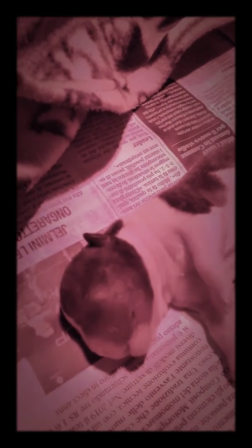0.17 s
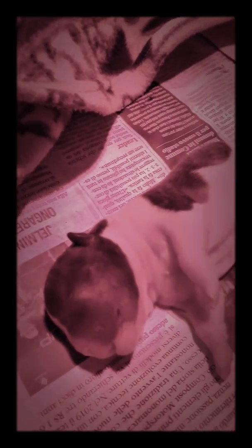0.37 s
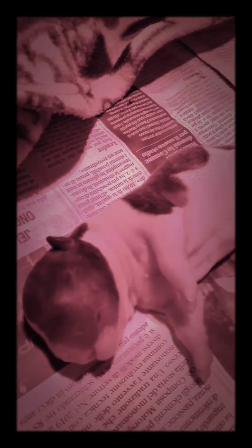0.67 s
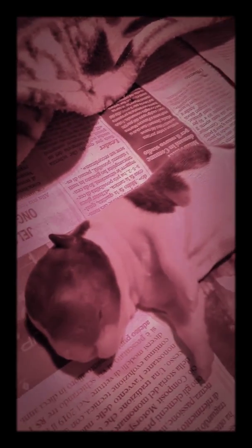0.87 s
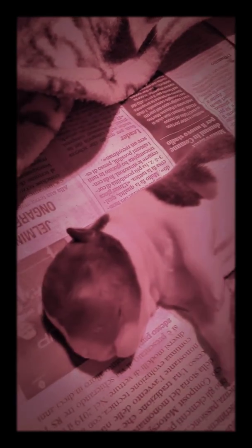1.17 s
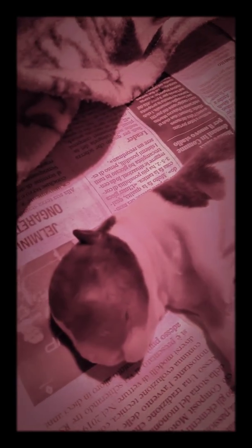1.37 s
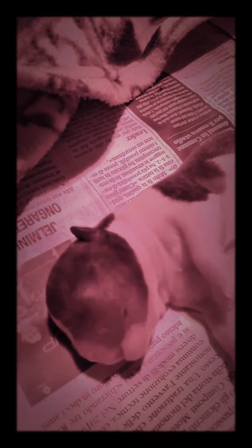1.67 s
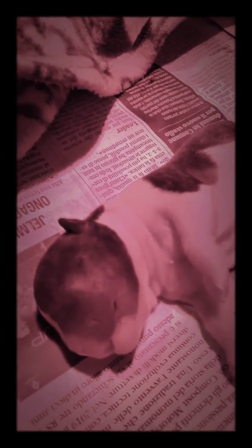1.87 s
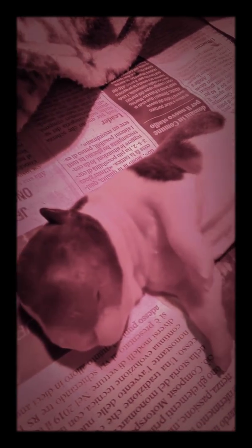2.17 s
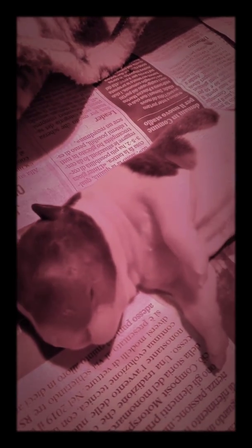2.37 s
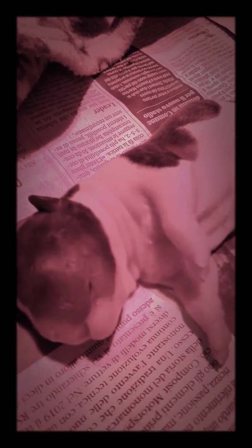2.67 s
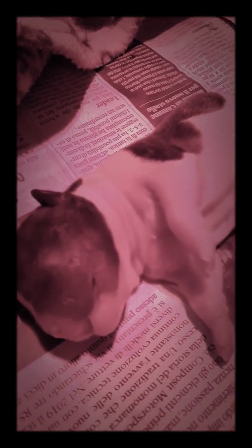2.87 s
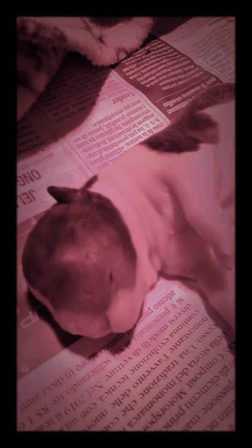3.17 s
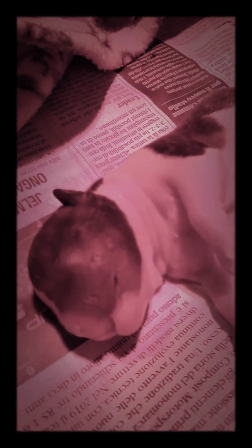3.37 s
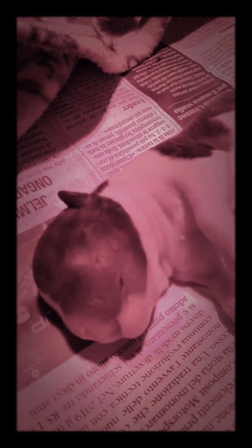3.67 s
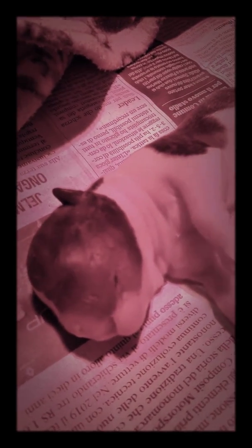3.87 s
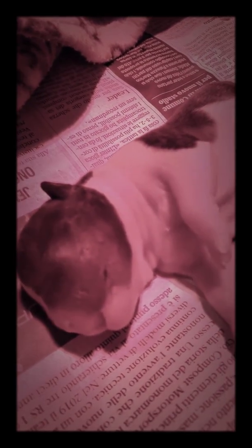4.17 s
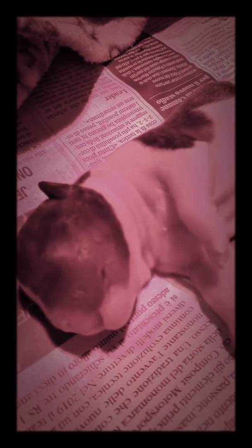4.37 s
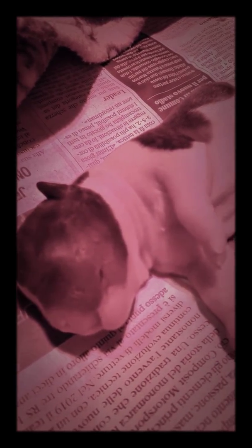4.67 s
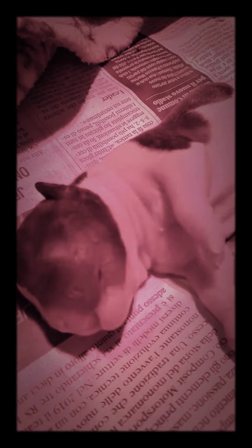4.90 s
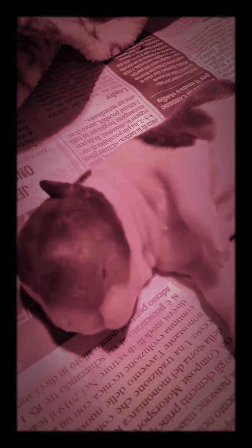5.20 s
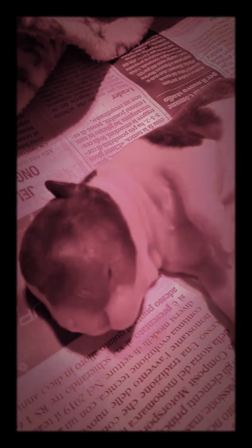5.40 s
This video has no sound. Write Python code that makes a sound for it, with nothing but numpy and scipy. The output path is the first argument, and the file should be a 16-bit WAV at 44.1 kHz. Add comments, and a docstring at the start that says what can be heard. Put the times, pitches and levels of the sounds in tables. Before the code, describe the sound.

Close, dry stereo sound of a small soft body twitching on newspaper in a very quiet room. From 0.1 to 0.5 s a gentle rub with fine hiss and a padded low bump at 0.3. Raspier rubbing follows around 0.6-1.0, with a dull thump near 0.86. Brief bright brushes and small ticks come at 1.3 and 1.6. At 2.2 a rub leads to a sharp, crisp crease snap and scuff at 2.33. More rubbing near 2.6, then a strong raspy scuff at 2.9 and a deep soft bump at 3.0. A quick flurry of scuffs, clicks and left-sided thuds runs 3.2-3.6, with a light brush at 3.86. From 4 to 5 s it is almost still, with faint stirrings and a muffled bump at 4.56. A last burst at 5.0-5.3 brings a bright scuff, snap and thud, then rubbing to the end. Low judder on the left; faint hiss and right-sided drone throughout.

```python
"""Something soft rubs and scuffs on paper close to the microphones, in a quiet room.
The rubs and scuffs are filtered friction noise; creases tick as dispersed, resonant clicks.
Soft bumps now and then are pushes that rock damped low resonances.
A low rumble and judder lie under the rubbing movements, strongest on the left.
Faint noise makes the room and a low drone on the right."""
import sys
import numpy as np
from scipy import signal
from scipy.fft import rfft, irfft
from scipy.io import wavfile
from scipy.ndimage import uniform_filter1d

SR = 44100
rng = np.random.default_rng(int(sys.argv[2]) if len(sys.argv) > 2 else 0)


def transcribe(u):
    """Save the signal u as a 16-bit wav file named by the first command-line argument.

    u: samples, shape (n,) or (channels, n), limited to [-1, 1]; the rate is SR.
    q: integer samples, one column per channel.
    """
    v = np.clip(np.atleast_2d(u).T, -1, 1)
    q = np.round(v * 32767).astype(np.int16)
    wavfile.write(sys.argv[1], SR, q)


N = 244314
TIME = np.arange(N) / SR


def amp(db):
    """Logarithmic level: decibels become an amplitude gain."""
    return 10 ** (np.asarray(db) / 20)


def unit(x):
    """Normalisation: scales a signal to rms 1."""
    return x / np.sqrt(np.mean(x ** 2) + 1e-20)


def colour(x, spectrum):
    """Minimum-phase filtering: a causal response with the given spectrum and a power gain of 1."""
    hz, db = np.transpose(spectrum)
    f = abs(np.fft.fftfreq(4096, 1 / SR))
    level_db = np.interp(np.log(f + 1), np.log(hz + 1), db)
    log_gain = np.log(amp(np.maximum(level_db, -100)))
    # the Hilbert transform of the log gain supplies the phase
    taps = np.fft.ifft(np.exp(np.conj(signal.hilbert(log_gain)))).real[:2048]
    taps = taps / np.linalg.norm(taps)
    return signal.oaconvolve(x, taps[None], axes=1)[:, :N]


def pan(db):
    """Level stereophony: gains for a left-over-right difference, at constant power."""
    ratio = amp(np.atleast_1d(db))
    return np.array([ratio, np.ones_like(ratio)]) * np.sqrt(2 / (1 + ratio ** 2))


def noise(alike):
    """Partial coherence: white noise at two microphones with the given correlation."""
    a, b = rng.standard_normal((2, N))
    alike = np.clip(alike, -1, 1)
    return np.array([a, alike * a + np.sqrt(1 - alike ** 2) * b])


def wander(hz):
    """Low-pass random fluctuation: slow chance of rms 1, up to the given rate."""
    f = np.fft.rfftfreq(N, 1 / SR)
    return unit(irfft(rfft(rng.standard_normal(N)) / (1 + (f / hz) ** 4), N))


def fibres(per_s, spread_db, smooth, alike):
    """Asperity friction: countless tiny slips, with some larger catches among them."""
    size = amp(spread_db * np.minimum(rng.exponential(1, N), 4))
    catches = size * (rng.random(N) < per_s / SR)
    return unit(noise(alike) * (unit(catches) + smooth))


def add(mix, s, sound):
    """Superposition: mixes a stereo sound in at time s."""
    part = mix[:, max(round(s * SR), 0):][:, :sound.shape[1]]
    part += sound[:, :part.shape[1]]


def stroke(start, length, rise_s, fall_s, ease, swell_db=0):
    """Envelope of one movement: it eases in, holds while swelling or fading, and eases out."""
    early = np.maximum(start - TIME, 0)
    late = np.maximum(TIME - start - length, 0)
    # each flank's time constant grows by ease seconds per second of length
    away = early / (rise_s + ease * length) + late / (fall_s + ease * length)
    swell = amp(swell_db * (np.clip((TIME - start) / length, 0, 1) - .5))
    return swell * np.exp(-np.minimum(away, 20))


# the sheet's main resonance, moving with the place of contact: time_s [s], resonance_hz [Hz]
SHEET_RESONANCE = [(.35, 1670), (.8, 950), (1.2, 1800), (5.1, 1660), (5.3, 1360)]


def flex(x, patchy_db, hz_size, time_size, resonance_db=0):
    """Time-varying resonance: colour drifts in random patches; the sheet's resonance and octave stand out."""
    hz, t, z = signal.stft(x, SR, nperseg=1024, noverlap=768)
    patches = rng.standard_normal(z.shape[1:])
    for _ in range(2):
        patches = uniform_filter1d(patches, hz_size, 0)
        patches = uniform_filter1d(patches, time_size, 1)
    octaves = np.log2((hz[:, None] + 1) / np.interp(t, *np.transpose(SHEET_RESONANCE)))
    peaks = np.exp(-(octaves / 0.36) ** 2) + 0.45 * np.exp(-((octaves - 1) / 0.36) ** 2)
    gain = amp(patchy_db * unit(patches) + resonance_db * peaks)
    return unit(signal.istft(z * gain, SR, nperseg=1024, noverlap=768)[1][:, :N])


# what the sheets ring with when snapped or scuffed: mode_hz [Hz], level_db [dB], t60_s [s]
SHEET_MODES = [(345, 8, 0.04), (1240, 5, 0.032), (2100, 0, 0.018), (2900, -1, 0.016)]


def ring(x):
    """Modal resonance: a sound together with the modes that it sets ringing."""
    out = x
    for hz, db, t60 in SHEET_MODES:
        out = out + amp(db) * signal.lfilter(*signal.iirpeak(hz, hz * t60 / 2.2, fs=SR), x)
    return out


# shading of the right microphone from the finest hiss: frequency_hz [Hz], gain_db [dB]
RIGHT_SHADE = [(2000, -5), (4500, -1), (7500, 3.5), (12000, -15.5)]


def shaded(x):
    """Acoustic shading: a frequency-dependent gain colours the right channel only."""
    hz, db = np.transpose(RIGHT_SHADE)
    gain = amp(np.interp(np.fft.rfftfreq(N, 1 / SR), hz, db))
    return np.array([x[0], irfft(rfft(x[1]) * gain, N)])


# spectral shape of still air and microphone hiss: frequency_hz [Hz], density_db [relative dB per Hz]
ROOM_SPECTRUM = [(150, -10), (450, 2), (2600, -3.5), (9000, -8), (15600, -6)]
# spectral shape of the low drone: frequency_hz [Hz], density_db [relative dB per Hz]
DRONE_SPECTRUM = [(25, -19), (75, 4.5), (200, -3.5), (300, 2), (430, -4.5), (1500, -25)]


def room():
    """Stationary noise floor: still air and microphone hiss, with a faint low drone on the right."""
    air = amp(-71.0) * colour(noise(0), ROOM_SPECTRUM)
    drone = amp(-69.0) * colour(noise(0), DRONE_SPECTRUM)
    return air + drone * np.array([[0], [1]])


# spectral shape of dull rumble and shivers: frequency_hz [Hz], density_db [relative dB per Hz]
RUMBLE_SPECTRUM = [(25, -36.5), (50, -10), (80, 0), (150, 4.5), (330, -11), (1000, -24.5), (2000, -53)]
# low rumbles under the rubbing: start_s [s], length_s [s, without flanks], level_db [relative dB]
RUMBLES = [(0.067, 0.35, -52), (0.571, 0.12, -57), (0.768, 0.25, -56.5), (1.096, 0.093, -56.5),
           (1.292, 0.46, -53.5), (1.767, 0.28, -56), (2.109, 0.28, -50.5), (2.478, 0.24, -55.5),
           (3.202, 0.26, -62.5), (3.55, 0.061, -52.5), (3.822, 0.11, -58), (4.225, 0.061, -63),
           (4.379, 0.01, -65.5), (4.549, 0.052, -57.5), (5.03, 0.12, -54), (5.257, 0.15, -56.5),
           (5.462, 0.094, -50.5)]


def rumble(rise_s=0.0033, fall_s=0.012, ease=0.053):
    """Stick-slip friction: dull, uneven noise and a drifting judder under the rubbing movements."""
    power = 0
    for start, length, db in RUMBLES:
        power = power + (amp(db) * stroke(start, length, rise_s, fall_s, ease)) ** 2
    slips = flex(colour(noise(0.81), RUMBLE_SPECTRUM), patchy_db=3, hz_size=2, time_size=4)
    turns = np.cumsum(250 * np.exp(0.32 * wander(hz=43.77))) / SR  # near-regular, around 250 Hz
    judder = np.sin(2 * np.pi * turns) * (1 + .5 * wander(hz=18.0))
    return unit(slips + 0.41 * judder) * np.sqrt(power) * pan(8.2)


# soft bumps: release_s [s], push_db [relative dB], ring_hz [Hz], sharpness_q [Q],
# left_over_right_db [dB]
BUMPS = [(0.307, -18.5, 127, 0.74, 11), (0.857, -20.5, 133, 1.7, 11), (1.287, -31.5, 234, 3.3, 19),
         (1.5084, -40, 173, 3.6, 11), (1.635, -42, 620, 8.2, 14), (2.335, -25.5, 248, 1.9, 27),
         (2.351, -26, 189, 3.4, 25), (2.658, -25.5, 342, 3.3, 22), (2.903, -32, 193, 5.1, 16),
         (2.993, -19.5, 147, 1.37, 11), (3.3038, -36, 102, 2.9, 8), (3.35, -28.5, 120, 7.9, 34),
         (3.396, -31, 122, 5.2, 23), (3.426, -28, 122, 5.8, 42), (3.5662, -23, 190, 0.83, 28),
         (3.871, -36.5, 98, 2.6, 15), (4.064, -41, 140, 5.1, 31), (4.562, -27, 106, 0.76, 30),
         (5.181, -21.5, 139, 4.8, 28), (5.186, -27, 330, 7, 14)]


def bumps(build_s=0.0055, release_turns=0.051, shiver_db=-25, shiver_s=0.016):
    """Damped oscillator: a padded push builds and lets go, rocking a low resonance; the sheets shiver."""
    t = np.arange(-1500, 6000) / SR  # 0 is the moment of release
    out, shiver = np.zeros((2, 2, N))
    for s, db, hz, q, side_db in BUMPS:
        w = 2 * np.pi * hz
        # the release lasts a fixed share of the ring's period
        push = np.exp(np.minimum(t, 0) / build_s) * (1 - np.tanh(t * hz / (2 * release_turns)))
        thud = signal.lfilter(*signal.bilinear([1, 0, 0], [1, w / q, w * w], SR), push)
        add(out, s + t[0], amp(db - 6.5) * pan(side_db) * thud)
        add(shiver, s, amp(db + shiver_db) * pan(side_db) * np.exp(-(t - t[0]) / shiver_s))
    return out + colour(shiver * noise(0.23), RUMBLE_SPECTRUM)


# spectral shapes of fine hiss and of rasp: frequency_hz [Hz], density_db [relative dB per Hz]
HISS_SPECTRUM = [(2000, -9.5), (5000, -10), (6500, -6.5), (10200, 2.5), (12300, -4.5), (15600, -5.5)]
RASP_SPECTRUM = [(200, -26), (480, -2.5), (950, -2), (1400, -8), (2100, -2.5), (3500, -6), (5200, -10.5),
                 (9000, -14)]
# faint background hiss, dropping a little near 4 s: time_s [s], hiss_db [relative dB]
BACKGROUND_HISS = [(3.6, -66.5), (4.0, -73)]
# slow rubs: start_s [s], length_s [s, without flanks], hiss_db [relative dB], rasp_db [relative dB],
# swell_db [dB, start to end], left_over_right_db [dB]
SLIDES = [(0.193, 0.18, -48, -55, 1.5, -1.5), (0.55, 0.31, -72, -55, 5, 9),
          (0.779, 0.092, -53.5, -46.5, -4, 4), (0.898, 0.12, -60, -60, -4.5, 1),
          (1.081, 0.087, -51, -60.5, 0, -2), (1.266, 0.073, -54, -86, -4, 1.5),
          (1.425, 0.14, -56, -68.5, 5.5, -1.5), (1.79, 0.15, -59.5, -71, 2, 0.5),
          (2.027, 0.087, -55.5, -64.5, -4.5, 4), (2.195, 0.083, -45.5, -47.5, 2.5, 3.5),
          (2.348, 0.19, -56.5, -65.5, -15.5, 0.5), (2.579, 0.1, -50, -53, 6.5, 6),
          (2.776, 0.052, -62, -58.5, -7, 4.5), (3.297, 0.074, -58.5, -75, -8.5, -1),
          (3.556, 0.05, -53.5, -69, -3, 3), (3.843, 0.086, -60.5, -66, 4.5, 5),
          (5.042, 0.048, -53, -51.5, -3.5, 3), (5.119, 0.083, -58, -59, -3, -3),
          (5.258, 0.18, -55.5, -54.5, 1.5, -2.5), (5.47, 0.054, -52.5, -51.5, 11, 5.5)]


def sliding(rise_s=0.0056, fall_s=0.0011, ease=0.33, background_rasp_db=-12.5):
    """Sliding friction: something soft rubs on paper, a rasp under a fine hiss, both with uneven pressure."""
    hiss_power = np.ones((2, 1)) * amp(np.interp(TIME, *np.transpose(BACKGROUND_HISS))) ** 2
    rasp_power = hiss_power * amp(background_rasp_db) ** 2  # relative to the background hiss
    for start, length, hiss_db, rasp_db, swell_db, side_db in SLIDES:
        power = (pan(side_db) * stroke(start, length, rise_s, fall_s, ease, swell_db)) ** 2
        hiss_power += amp(hiss_db) ** 2 * power
        rasp_power += amp(rasp_db) ** 2 * power
    pressure = wander(hz=25.2)
    hiss = colour(fibres(per_s=2000, spread_db=1.6, smooth=1.8, alike=0), HISS_SPECTRUM)
    rasp = colour(fibres(per_s=2600, spread_db=1.8, smooth=1.3, alike=0), RASP_SPECTRUM)
    # pressure moves the hiss by 2.1 dB rms and the rasp by 0.5 dB rms
    hiss = flex(hiss, patchy_db=1.5, hz_size=24, time_size=12) * amp(2.1 * pressure)
    rasp = flex(rasp, patchy_db=2, hz_size=4, time_size=7, resonance_db=9) * amp(pressure / 2)
    return hiss * np.sqrt(hiss_power) + rasp * np.sqrt(rasp_power)


# spectral shape of the scuffs' rasp: frequency_hz [Hz], density_db [relative dB per Hz]
SCRAPE_SPECTRUM = [(150, -23), (450, -1.5), (3500, -5.5), (8000, -17.5)]
# quick brushes: peak_s [s], hiss_db [relative dB], rasp_db [relative dB],
# length_s [s, rise plus fall time constants], left_over_right_db [dB]
SCUFFS = [(0.293, -43, -52, 0.013, -5), (1.2815, -38, -50, 0.0078, -2), (1.634, -39.5, -70, 0.0069, -1.5),
          (2.336, -34.5, -42, 0.015, 1), (2.895, -34.5, -36.5, 0.015, 3.5), (3.206, -52, -68, 0.0064, -1),
          (3.225, -48.5, -82, 0.011, 25), (3.349, -45.5, -48, 0.0081, 19), (3.394, -40.5, -40, 0.011, 5),
          (3.424, -44, -52, 0.02, 10), (3.511, -52.5, -60, 0.01, 23), (3.552, -40.5, -58, 0.008, 18),
          (3.567, -40.5, -36, 0.0053, 5), (3.861, -43.5, -79, 0.0082, 31), (4.234, -69, -68, 0.035, 6),
          (4.392, -65, -72.5, 0.016, 10), (4.655, -62, -78, 0.019, 5), (4.998, -50.5, -79, 0.0063, 24),
          (5.129, -38.5, -45, 0.0095, 23), (5.176, -34, -39, 0.01, 3), (5.268, -48.5, -54, 0.014, 1.5)]


def scuffs(rise_share=0.41):
    """Transient friction: each quick brush swells and dies within a few hundredths of a second."""
    hiss, rasp = np.zeros((2, 2, N))
    for s, hiss_db, rasp_db, length, side_db in SCUFFS:
        away = np.maximum((s - TIME) / rise_share, (TIME - s) / (1 - rise_share)) / length
        away = np.minimum(away, 20)
        brush = pan(side_db) * np.exp(1 - np.hypot(away, 1))  # a rounded peak with exponential flanks
        hiss += amp(hiss_db) * brush
        rasp += amp(rasp_db) * brush
    fine = flex(noise(0), patchy_db=3.5, hz_size=26, time_size=8)
    coarse = fibres(per_s=1800, spread_db=4, smooth=.7, alike=0)
    coarse = flex(coarse, patchy_db=2, hz_size=7, time_size=8)
    return colour(hiss * fine, HISS_SPECTRUM) + ring(colour(rasp * coarse, SCRAPE_SPECTRUM)) / 2


# creases snapping: start_s [s], level_db [relative dB], brightness_hz [Hz], left_over_right_db [dB]
SNAPS = [(0.148, -38, 2200, 0), (0.584, -39, 3870, -4), (1.2805, -39, 2880, 18), (1.5117, -43.5, 3360, 23),
         (1.632, -40.5, 1580, 4), (2.318, -35.5, 2700, -1), (2.3343, -19.5, 4160, 0.5),
         (2.657, -36, 2900, 2), (2.787, -32.5, 2280, -1), (2.807, -39.5, 1500, -7),
         (3.347, -39.5, 3900, 27), (3.396, -28.5, 3340, 33), (3.4221, -35, 2790, 14),
         (3.551, -39, 4060, 20), (3.5645, -30, 3680, 7), (3.860, -39.5, 3640, 11), (4.571, -39, 1070, 7),
         (5.098, -37, 1000, -2), (5.181, -27, 3100, 7)]


def snaps(spread_s=0.000903, lag_s=0.000338, crinkle_db=-32, crinkle_s=0.0031, hollow_db=5):
    """Bending-wave dispersion: a crease's click runs through the sheet, treble ahead of bass, then crinkles."""
    t, f = TIME[:4096], np.fft.rfftfreq(4096, 1 / SR)
    out = np.zeros((2, N))
    for s, db, bright_hz, side_db in SNAPS:
        dispersion = 2 * spread_s * np.sqrt(f * bright_hz)
        turns = dispersion + f * np.array([[0], [lag_s]])  # the right microphone hears it later
        swell = amp(crinkle_db) * t / crinkle_s * np.exp(1 - t / crinkle_s)
        crinkle = swell * rng.standard_normal((2, len(t)))
        click = irfft(np.exp(-2j * np.pi * turns)) + crinkle
        # a slack crease resonates lower and sounds duller than a taut one
        sound = ring(signal.lfilter(*signal.cheby1(4, hollow_db, bright_hz, fs=SR), click))
        add(out, s, amp(db - 21.5) * pan(side_db) * unit(sound))
    return out


def scene():
    """Superposition of sources: paper, bumps and rumble, all close and dry, over the quiet room."""
    paper = shaded(sliding() + scuffs() + snaps())
    return paper + bumps() + rumble() + room()


def record(dry, low_cut_hz=38, edge_hz=15700):
    """Band limitation: the recorder's bass cut and upper band edge."""
    thin = signal.sosfilt(signal.butter(2, low_cut_hz, "high", fs=SR, output="sos"), dry)
    band_limit = signal.firwin(511, edge_hz, window=("kaiser", 9), fs=SR)
    return signal.oaconvolve(thin, band_limit[None], "same")


dry = scene()
out = record(dry)
transcribe(out)
```